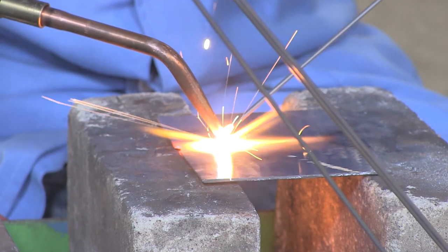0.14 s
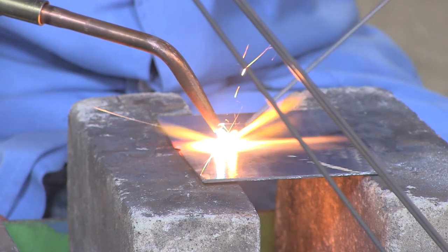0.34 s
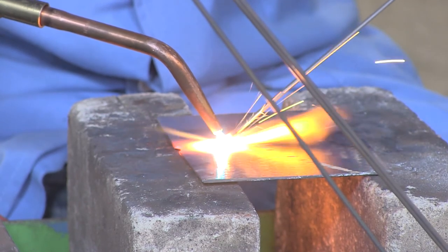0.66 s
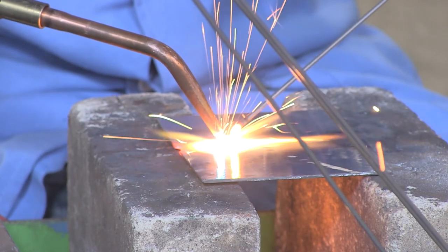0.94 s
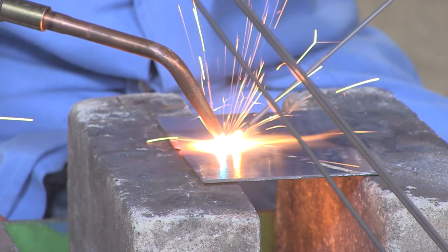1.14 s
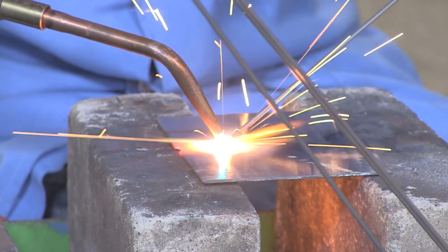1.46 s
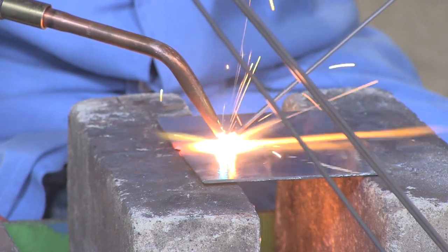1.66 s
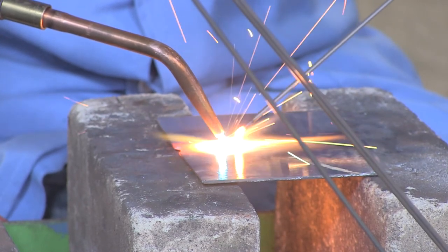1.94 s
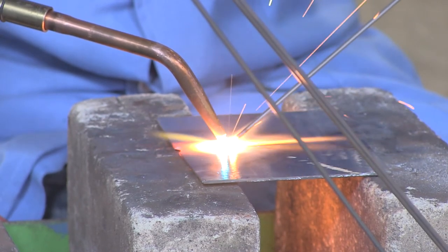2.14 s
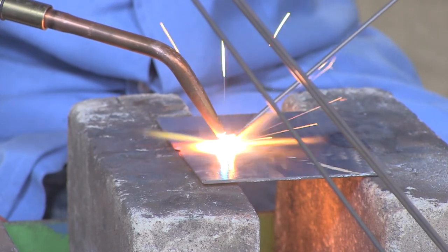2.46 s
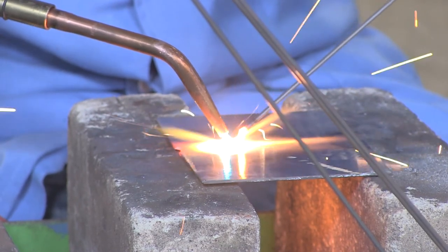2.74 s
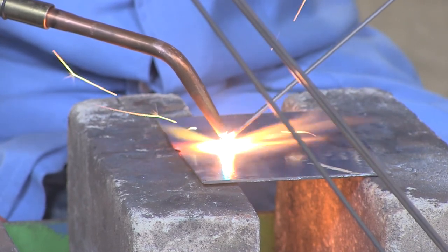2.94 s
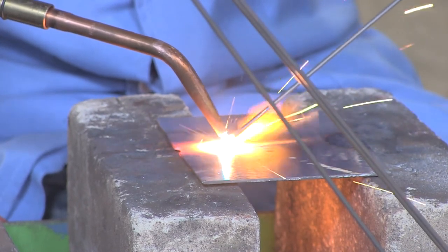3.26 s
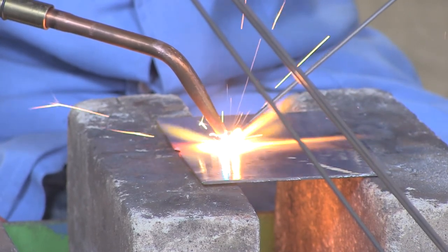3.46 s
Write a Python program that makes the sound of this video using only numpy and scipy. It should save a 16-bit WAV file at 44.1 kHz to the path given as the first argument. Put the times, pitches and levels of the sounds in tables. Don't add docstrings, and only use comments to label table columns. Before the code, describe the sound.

Close and dry, a welding torch on steel plate gives a constant bright, slightly fluttering hiss. One loud, very short click-like pop comes early, then quiet molten-metal spits cluster just before the end.

```python
import sys
import numpy as np
from scipy import signal
from scipy.fft import rfft, irfft, next_fast_len
from scipy.io import wavfile
from scipy.ndimage import uniform_filter1d, map_coordinates

SR = 44100
rng = np.random.default_rng(int(sys.argv[2]) if len(sys.argv) > 2 else 0)


def undo_db(level):
    steps = np.asarray(level, float) / 20
    return 10 ** steps


def master(y):
    cut = np.clip(np.atleast_2d(y).T, -1, 1)
    pcm = np.round(cut * 32767)
    wavfile.write(sys.argv[1], SR, pcm.astype(np.int16))


N = 158760

# (time [s], jet strength [dB], shoulder [dB], body [dB], echo depth [0-1])
TORCH_MOVES = [(0.0, -31, -10.5, -18.5, 0.69), (0.23, -30, -5.5, -15.5, 0.76), (0.56, -31, -7.5, -16, 0.77),
               (0.78, -31, -11, -19.5, 1), (1.15, -31.5, -6.5, -15.5, 1), (1.53, -33.5, -6, -16.5, 0.9),
               (1.72, -28.5, -7.5, -19, 1), (1.79, -30, -7.5, -16, 0.9), (2.26, -33, -9, -14.5, 0.79),
               (2.37, -31, -8, -17.5, 0.9), (2.6, -31, -6.5, -14, 0.9), (2.87, -28.5, -10, -17.5, 1),
               (3.05, -31, -4, -14.5, 0.98), (3.2, -30, -9.5, -18.5, 0.9), (3.36, -30.5, -5, -16.5, 0.9),
               (3.42, -32, -9, -12.5, 0.9), (3.47, -31, -5, -17, 1), (3.6, -30.5, -4.5, -16.5, 0.9)]
# (frequency [Hz], level [dB per Hz])
JET_TONE = [(1180, -23), (2000, -26), (5160, -15), (8220, -18), (8890, -16.5), (9690, -11.5), (11800, -11),
            (13800, -0.5), (15700, -4)]
# (center [Hz], width [Hz], boost [dB])
JET_HUMPS = [(5370, 440, 1), (6560, 97, 0), (8300, 320, 5), (9800, 400, 4.5), (10870, 500, 3.5),
             (12800, 600, 5), (14600, 700, 3)]
# (center [Hz], width [Hz], change [dB])
ECHO_NOTCHES = [(3950, 200, -2), (6020, 200, -4), (7000, 120, -7), (8620, 130, -5), (9060, 130, -6),
                (11700, 250, 3.5)]
# (frequency [Hz], level [dB per Hz])
ROAR_TONE = [(15, -58), (25, -25), (68, -4.5), (115, 1), (374, -6), (604, -10.5), (1370, -11),
             (2220, -24.5), (3000, -19), (3900, -7), (6600, -120)]
# (start [s], length [s], level [dB], brightness [0-1])
POOL_PUFFS = [(.14, 0.042, -47, 0), (.28, .03, -52, .3), (0.67, 0.028, -51.5, 0), (0.733, 0.023, -46.5, 0),
              (1.697, 0.031, -49, .3), (2.058, 0.031, -50.5, 0.3), (3.224, .013, -47, 0),
              (3.269, .015, -50, .35), (3.21, .17, -48, 0.22), (1.66, .1, -53, .01), (3.374, .01, -37, .03),
              (3.376, .064, -37, .9), (3.432, .02, -40, .6), (3.445, .016, -37.5, .7), (.1, .75, -54, .03),
              (3.456, .015, -38, .05), (3.468, .03, -47, .02)]
# (frequency [Hz], level [dB])
DULL_TONE = [(40, -70), (80, -22), (150, -4.5), (300, 1.5), (500, -2.5), (1000, -13), (2500, -19),
             (4000, -60)]
# (frequency [Hz], level [dB])
BRIGHT_TONE = [(150, -70), (400, -20), (700, -9), (950, -1), (2000, -3), (4000, -7.5), (5600, -6.5),
               (6500, -50)]
# (time [s], low edge [Hz], high edge [Hz])
SIDE_PATCHES = [(.03, 11000, 13200), (.216, 6200, 7700), (.68, 5100, 6900), (1.098, 6900, 8300),
                (1.934, 9600, 11800), (1.934, 4200, 5700), (2.027, 4700, 5700), (3.165, 13800, 15700),
                (3.165, 8300, 9700), (3.165, 4700, 6300), (3.536, 13800, 15200), (3.536, 6900, 8300)]

BODY_HZ, BODY_FOLLOWS = 7300, 0.7
SHOULDER_HZ, SHOULDER_FOLLOWS = 12500, 0.75


def unit(x):
    return x / np.sqrt(np.mean(x ** 2) + 1e-20)


def along(points, hz):
    f, value = np.transpose(points)
    return np.interp(np.log(hz + 1), np.log(f + 1), value)


def wobble(rate, size=N):
    last = N * rate / SR
    return map_coordinates(rng.standard_normal(int(last + 4)), [np.linspace(0, last, size)])


def filtered(x, response):
    m = next_fast_len(N + SR // 2)
    return irfft(rfft(x, m) * response(np.fft.rfftfreq(m, 1 / SR)), m)[..., :N]


def below(hz, edge_hz):
    return 1 / (1 + (hz / edge_hz) ** 24)


def rush(shape_db, patchy_db, tall, wide):
    hz, t, z = signal.stft(rng.standard_normal(N), SR, nperseg=512)
    patches = uniform_filter1d(rng.standard_normal(z.shape), tall, 0)
    patches = unit(uniform_filter1d(patches, wide, 1))
    gain_db = shape_db(hz[:, None], t) + patchy_db * patches
    x = signal.istft(z * undo_db(gain_db), SR, nperseg=512)[1]
    return unit(x[:N])


def hiss_tone_db(hz, t):
    s, _, shoulder_db, body_db, depth = np.transpose(TORCH_MOVES)
    body = BODY_FOLLOWS * np.interp(t, s, body_db - body_db.mean()) * below(hz, BODY_HZ)
    shoulder = SHOULDER_FOLLOWS * np.interp(t, s, shoulder_db - shoulder_db.mean())
    shoulder = shoulder * below(hz, SHOULDER_HZ) / (1 + (BODY_HZ / (hz + 1)) ** 24)
    tone = along(JET_TONE, hz) + shoulder + body
    for center, width, db in JET_HUMPS:
        tone = tone + db * np.exp(-.5 * ((hz - center) / width) ** 2)
    echo = np.interp(t, s, depth)
    for center, width, db in ECHO_NOTCHES:
        depth_now = echo + .25 * wobble(3.94, size=len(t))
        center_now = center * (1 + 0.018 * wobble(6.17, size=len(t)))
        tone = tone + db * depth_now * np.exp(-.5 * ((hz - center_now) / width) ** 2)
    return tone


def flutter_db():
    return .5 * wobble(8.24) + 0.55 * wobble(24.97) + 0.57 * wobble(120)


def jet_hiss(strength_db):
    jet = rush(hiss_tone_db, 0.98, tall=14, wide=12)
    body = filtered(jet, lambda hz: below(hz, BODY_HZ))
    fluttering = undo_db(flutter_db()) * body + undo_db(flutter_db()) * (jet - body)
    return undo_db(strength_db + 3.2) * fluttering


def flame_roar(strength_db):
    roar_db, follows = -20, 0.95
    mean_db = strength_db.mean()
    lumps_db = follows * (strength_db - mean_db) + 0.79 * wobble(4.77) + 0.87 * wobble(30.02)
    roar = undo_db(lumps_db) * rush(lambda hz, t: 0 * hz * t, 0.98, tall=4, wide=8)
    roar = filtered(roar, lambda hz: undo_db(along(ROAR_TONE, hz)))
    return undo_db(mean_db + roar_db) * unit(roar)


def flame():
    s, level_db = np.transpose(TORCH_MOVES)[:2]
    strength_db = np.interp(np.arange(N) / SR, s, level_db)
    return jet_hiss(strength_db) + flame_roar(strength_db)


def rough_noise(tone):
    noise = filtered(rng.standard_normal(N), lambda hz: undo_db(along(tone, hz)))
    return unit(noise) * undo_db(1.3 * wobble(250))


def puffs():
    t = np.arange(N) / SR
    dull, bright = rough_noise(DULL_TONE), rough_noise(BRIGHT_TONE)
    out = np.zeros(N)
    for start, length, db, share in POOL_PUFFS:
        share = np.clip(share, 0, 1)
        progress = np.clip((t - start) / length, 0, 1)
        swell = np.sin(np.pi * progress ** 0.72) ** 0.91
        out += undo_db(db) * swell * (np.sqrt(1 - share) * dull + np.sqrt(share) * bright)
    return out


def pop():
    pop_s, pop_db, kick_s, rebound_s, rebound = 1.20652, -3.6, .000106, .00024, .1
    ring_hz, ring_db, ring_t60 = 14400, -11, 0.0038
    thud_hz, thud_db, thud_t60 = 105, -39, .05
    cut_hz, cut_width_hz = 105, 55
    t = np.clip(np.arange(N) / SR - pop_s, 0, None)
    u, v = t / kick_s, t / rebound_s
    blast = (u ** 3 - 3 * u ** 2) * np.exp(-u) + rebound * v ** 2 * np.exp(-v)
    blast = filtered(blast, lambda f: -f * f / (cut_hz ** 2 - f * f + 1j * f * cut_width_hz))
    ring = undo_db(ring_db - 60 * t / ring_t60) * np.sin(2 * np.pi * ring_hz * t)
    thud = undo_db(thud_db - 60 * t / thud_t60) * np.sin(2 * np.pi * thud_hz * t)
    return undo_db(pop_db) * blast + ring - thud


def scene():
    return np.tile(flame() + puffs() + pop(), (2, 1))


def side_patches(x):
    patch_s, patch_db = .022, -3.5
    side, half = np.zeros(N), round(.75 * patch_s * SR)
    fade = np.clip(3 - 3 * np.abs(np.linspace(-1, 1, 2 * half)), 0, 1)
    hz = np.fft.rfftfreq(2 * half, 1 / SR)
    for s, low, high in SIDE_PATCHES:
        middle = round(s * SR)
        at = slice(middle - half, middle + half)
        scrambled = np.abs(rfft(x[at])) * np.exp(2j * np.pi * rng.random(half + 1))
        side[at] += undo_db(patch_db) * fade * irfft(scrambled * (hz > low) * (hz < high))
    return side


def microphone_band(hz):
    low_cut_hz, top_hz, skirt_hz, skirt_db = 56, 15750, 15900, -26
    top = np.where(hz < top_hz, 1, undo_db(skirt_db) * (hz < skirt_hz))
    return top / np.sqrt(1 + (low_cut_hz / (hz + 1)) ** 6)


def top_cut(x):
    return signal.sosfilt(signal.butter(12, 16640, fs=SR, output="sos"), x)


def record(dry):
    side = side_patches(dry[0])
    mix = filtered(dry + [side, -side], microphone_band)
    return top_cut(mix)


dry = scene()
out = record(dry)
master(out)
```